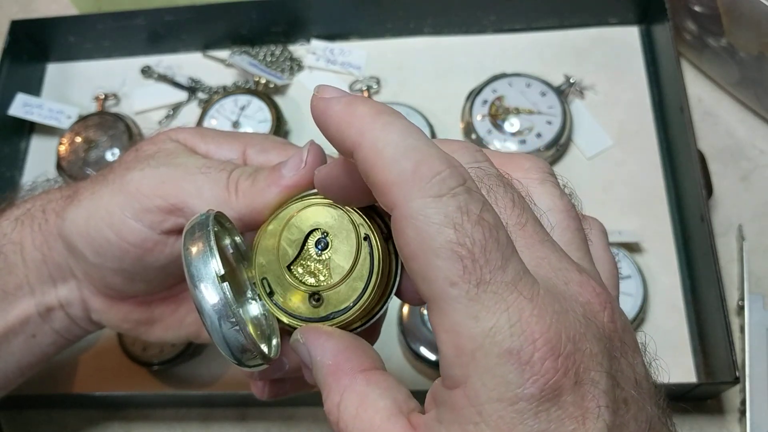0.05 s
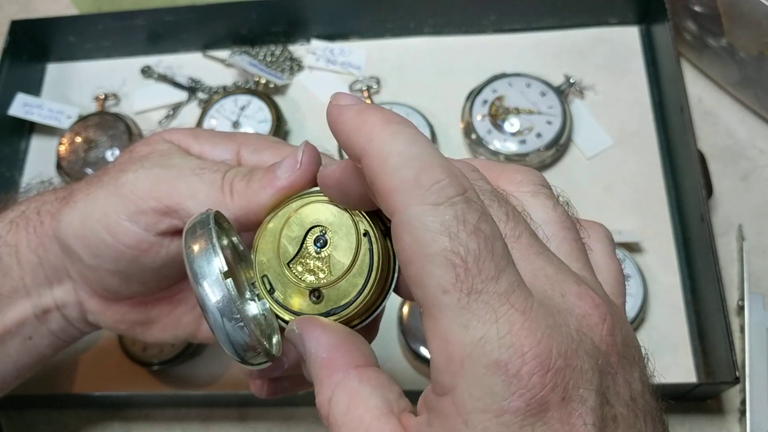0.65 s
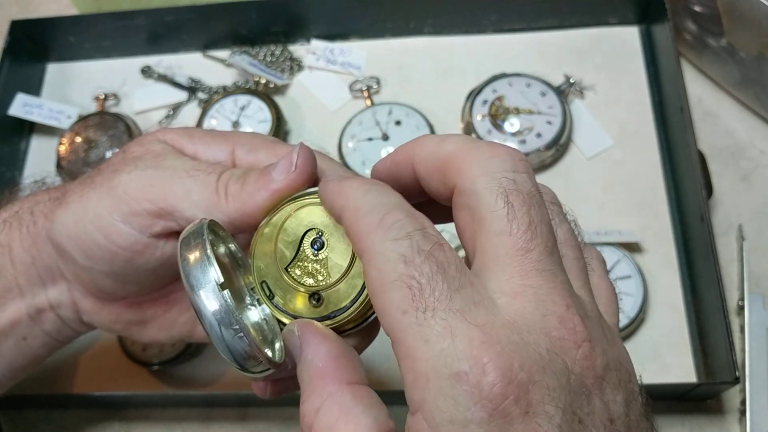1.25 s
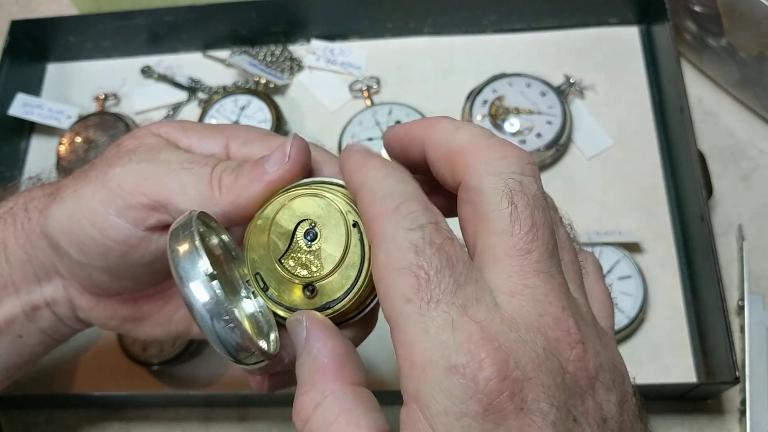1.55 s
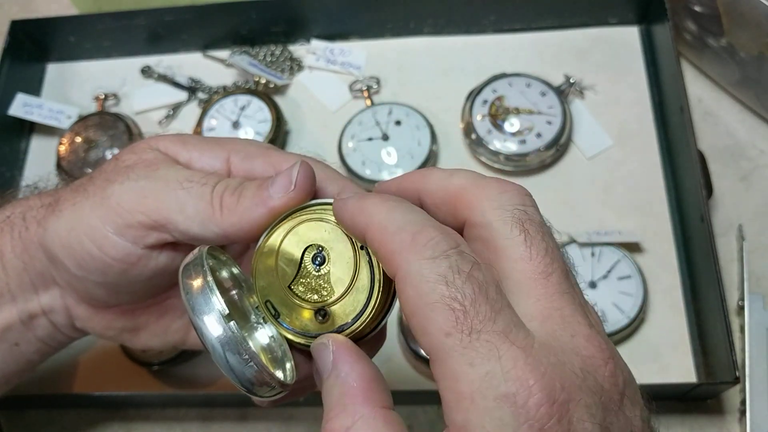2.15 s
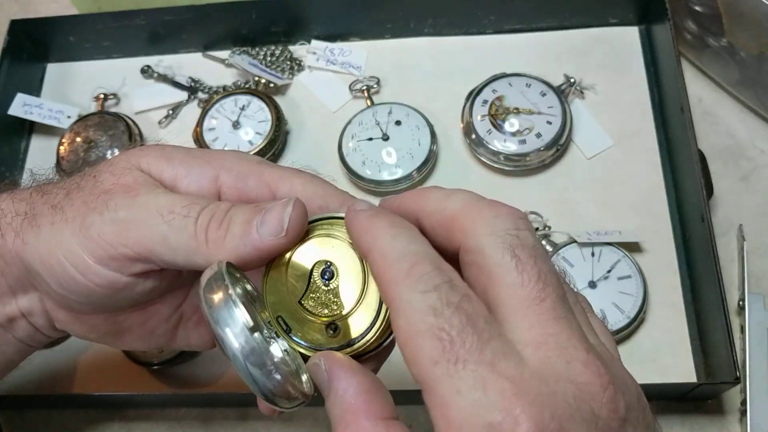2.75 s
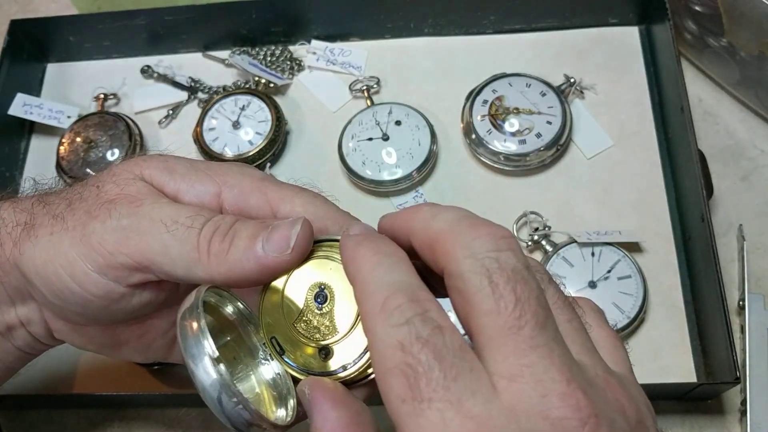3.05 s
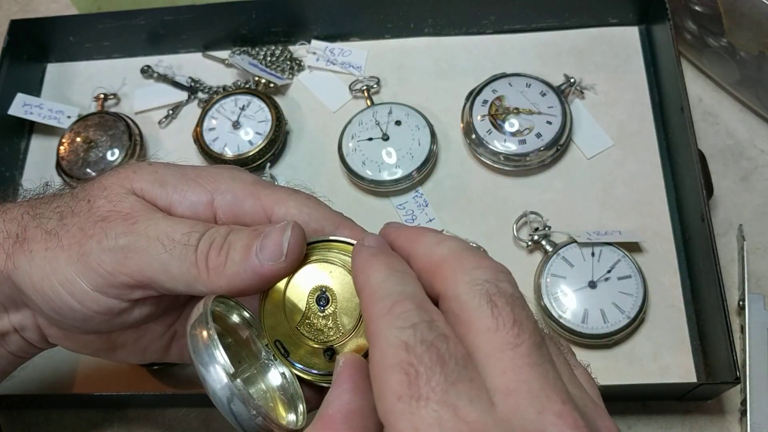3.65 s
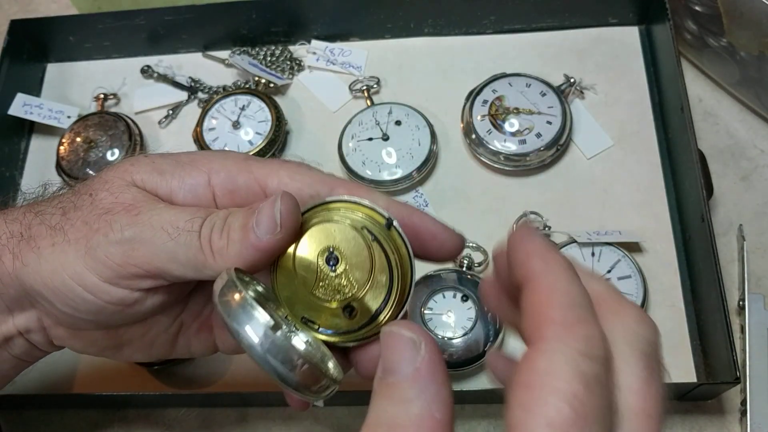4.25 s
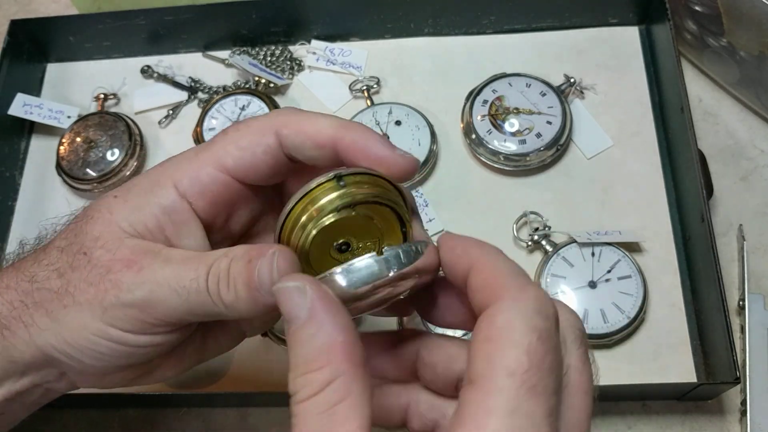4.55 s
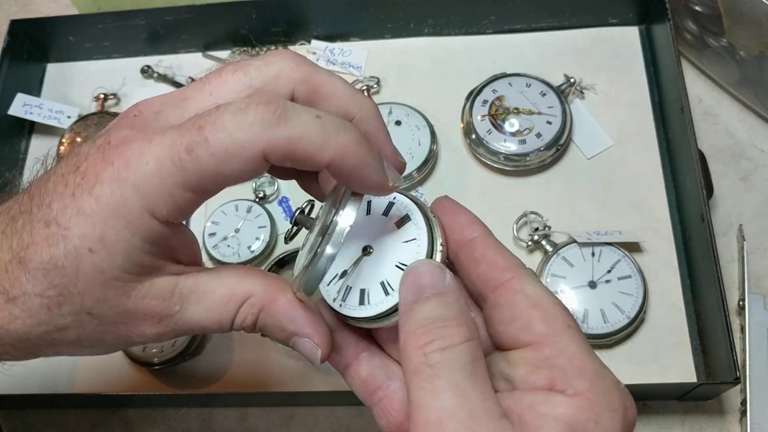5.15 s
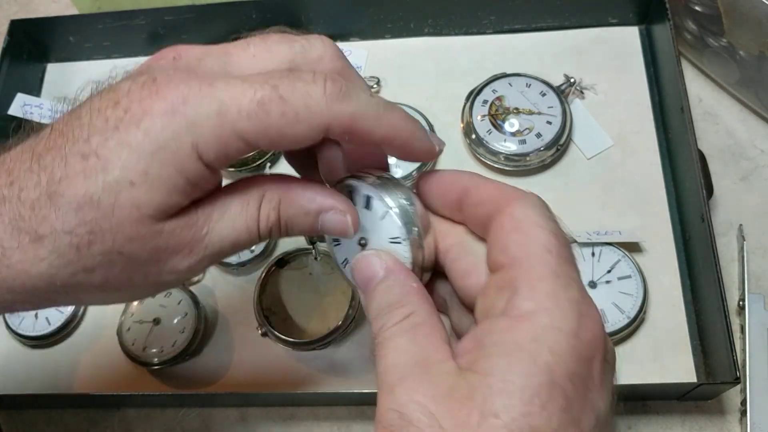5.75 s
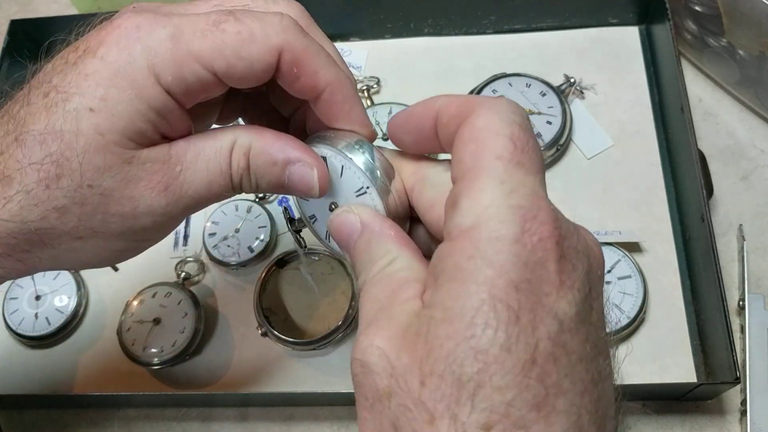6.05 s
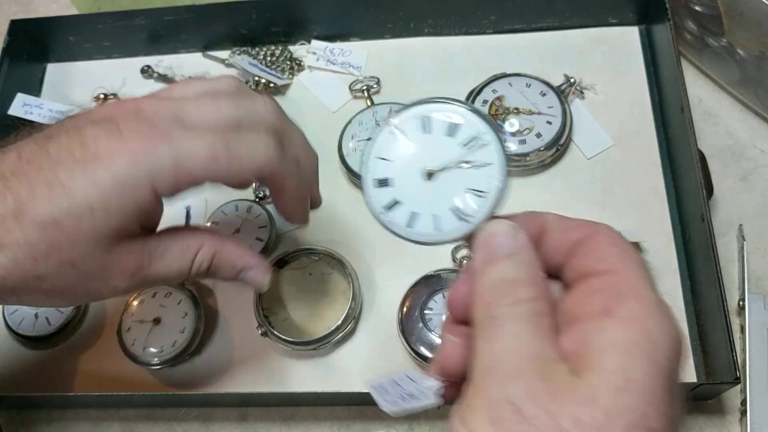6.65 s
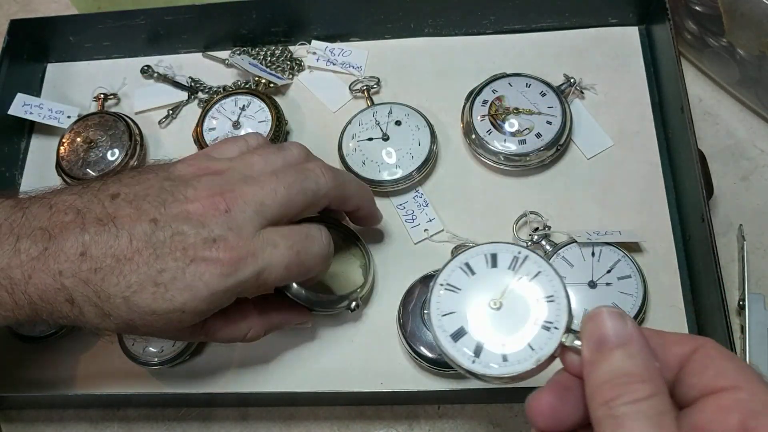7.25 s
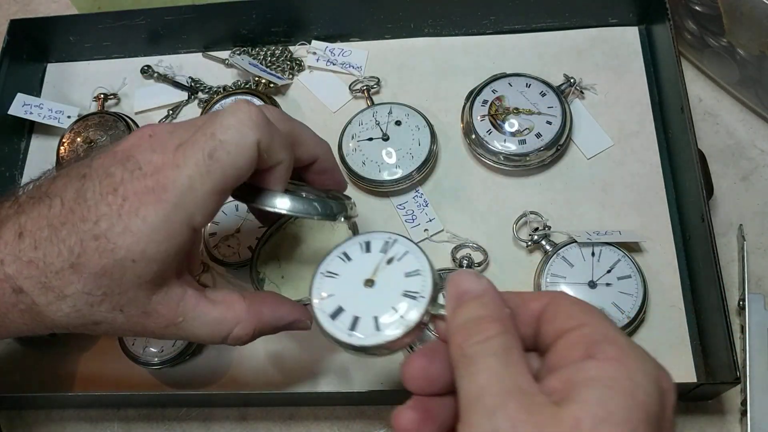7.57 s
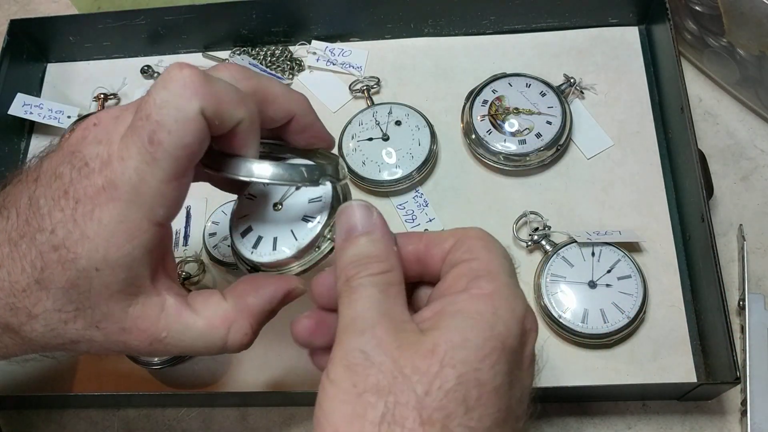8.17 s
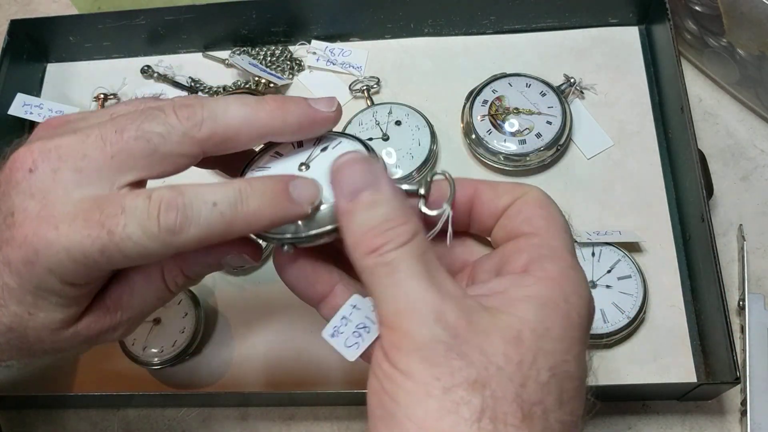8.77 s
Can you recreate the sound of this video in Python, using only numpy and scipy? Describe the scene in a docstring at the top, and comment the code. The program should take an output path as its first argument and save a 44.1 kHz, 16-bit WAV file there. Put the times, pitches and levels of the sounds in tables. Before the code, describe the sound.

Metal pocket watch cases click, snap shut and rattle in the hands, over faint ticking and a low room hum.

```python
"""In a quiet room, close up, two hands work a silver pocket watch over a tray of ticking watches. The dust cap
latch clicks, fingernails click unevenly on the watch and a spring pings. The back and the bezel (the rim around
the glass) snap shut, the catch cracks, the watch rattles into its outer case and the lid drops. Each hit makes
a part ring with its own few tones, which the fingers quickly damp. Fingers rub and bump softly, and a faint
rumble, hum and hiss lie underneath."""
import sys
import numpy as np
from scipy import signal
from scipy.fft import rfft, irfft
from scipy.io import wavfile
from scipy.ndimage import uniform_filter1d

SR = 44100
rng = np.random.default_rng(int(sys.argv[2]) if len(sys.argv) > 2 else 0)


def generate_wav(signal):
    """Clip the signal to [-1, 1] and save it as 16-bit WAV at the path in sys.argv[1]."""
    frames = np.transpose(np.atleast_2d(signal))
    scaled = np.clip(frames, -1, 1) * 32767
    pcm = np.round(scaled).astype(np.int16)
    wavfile.write(sys.argv[1], SR, pcm)


N = 397341


def gain(db):
    """Turn decibels into a multiplier."""
    return 10 ** (np.asarray(db) / 20)


def unit(x):
    """Scale a sound to an average (rms) level of 1."""
    return x / np.sqrt(np.mean(x ** 2))


def add(out, start_s, x):
    """Mix x into out from start_s on."""
    i = max(int(start_s * SR), 0)
    out[..., i:i + x.shape[-1]] += x[..., :max(N - i, 0)]


def noise(colour):
    """Noise shaped by (pitch_hz, level_db) points."""
    hz, db = np.transpose(colour)
    f = np.maximum(np.fft.rfftfreq(N, 1 / SR), 1)
    shape = gain(np.interp(np.log(f), np.log(hz), db))
    return unit(irfft(rfft(rng.standard_normal(N)) * shape, N))


def resonance(f, hz, q):
    """Favour pitches near hz; a higher q makes the peak narrower."""
    return 1 / (1 + 1j * q * (f / hz - hz / f))


def ring(tones, low_hz):
    """A tapped part: each tone fades 60 dB in ring_s, and small parts give off no bass."""
    t = np.arange(SR // 5) / SR
    # neighbouring tones swing against each other
    sound = sum((-1) ** k * gain(db) * 1000 ** (-t / ring_s) * np.sin(2 * np.pi * hz * t)
                for k, (hz, db, ring_s) in enumerate(tones))
    return signal.sosfilt(signal.butter(2, low_hz, "high", fs=SR, output="sos"), sound)


def contact(body, focus_db, level_db, bright_db_per_octave, spot_hz, chatter_s, chatter_db):
    """One blow, then a fading chatter of tiny bounces. Returns the sound ahead and all around."""
    size = len(body)
    t = np.arange(size) / SR
    chatter = rng.standard_normal(size) * rng.exponential(size=size) * np.exp(-t / chatter_s)
    force = gain(chatter_db) * chatter / np.linalg.norm(chatter)
    force[0] += 1  # the first blow
    f = np.maximum(np.fft.rfftfreq(2 * size, 1 / SR), 1)
    hardness = gain(bright_db_per_octave * np.log2(np.maximum(f, 200) / 3000))
    # the spot that is hit changes the tones near spot_hz by focus_db
    spot = 1 + (gain(focus_db) - 1) * resonance(f, spot_hz, q=13)
    ahead = rfft(force, 2 * size) * rfft(body, 2 * size) * hardness * spot
    # each tone beams its own way, so all directions together have a smoother spectrum
    smooth_power = uniform_filter1d(np.abs(ahead) ** 2, size=int(800 / f[1]))
    around = np.sqrt(np.abs(smooth_power)) * np.exp(-2j * np.pi * f * .001)  # 1 ms later
    sound = irfft([ahead, around])[:, :size]
    loudest = uniform_filter1d(sound[0] ** 2, size=SR // 250, mode="constant").max()
    return sound * gain(level_db) / np.sqrt(loudest)


def strike(hits, tones, low_hz, focus_db):
    """Play a list of hits on one part."""
    out = np.zeros((2, N))
    body = ring(tones, low_hz)[:SR // 10]
    for start_s, *blow in hits:
        add(out, start_s, contact(body, focus_db, *blow))
    return out


# how the rumble swells: time_s, relative_db
RUMBLE_SWELLS = [(0.0, -59), (0.22, -69), (0.3, -58), (1.13, -69), (1.38, -57), (1.5, -66), (2.98, -66),
                 (3.03, -54), (3.06, -62), (3.39, -68), (4.16, -61), (5.74, -69), (5.87, -57), (5.92, -66),
                 (6.78, -69), (8.66, -69), (8.98, -63), (9.01, -71)]
# the colour of the rumble and of the hiss: pitch_hz, relative_db
RUMBLE_SHAPE = [(15, -38.5), (25, -18), (33, -9.5), (50, 4), (85, 4), (110, -2.5), (156, -9.5),
                (200, -14.5), (300, -19), (390, -45), (660, -100)]
HISS_SHAPE = [(88, -32), (150, 0), (494, -10), (1040, -14.5), (1720, -15.5), (1900, -17), (2650, -16.5),
              (4950, -20.5), (7470, -27.5), (9630, -27.5), (10600, -32), (11300, -27), (12400, -32),
              (15100, -29), (16000, -35)]
# low hum and thin bands of high hiss: pitch_hz, width_hz, level_db
HUM_BANDS = [(50, 1.3, -74.5), (73.2, 1.5, -78.5), (103.24, 1, -75.5), (127, 1.1, -77.5), (9800, 250, -91),
             (11560, 250, -90.5), (14700, 450, -91.5)]
def background(rumble_trim_db=-1.5, hiss_db=-71):
    """A low rumble that swells as the hands move, a wavering hum and a steady hiss."""
    t, f = np.arange(N) / SR, np.fft.rfftfreq(N, 1 / SR)
    swell_db = np.interp(t, *np.transpose(RUMBLE_SWELLS))
    out = noise(RUMBLE_SHAPE) * gain(swell_db + rumble_trim_db)
    for hz, width_hz, db in HUM_BANDS:
        band = rfft(rng.standard_normal(N)) / (1 + ((f - hz) / width_hz) ** 2)
        out += gain(db) * unit(irfft(band, N))
    return out + noise(HISS_SHAPE) * gain(hiss_db)


# tones of the clockwork, used for all ticks and for the fingernail clicks: pitch_hz, level_db, ring_s
CLOCKWORK_TONES = [(2115, 1.5, 0.0017), (3209, 2.5, 0.0018), (4940, -3.5, 0.0024), (6362, -15.5, 0.0053),
                   (6991, -29, 0.0406), (7496, -11, 0.0018), (9994, -15, 0.0023), (11718, -25, 0.0068),
                   (14297, -15.5, 0.0031)]
# fingernail clicks on the watch: start_s, level_db, bright_db_per_octave, spot_hz
NAIL_CLICKS = [(0.023, -60, 1, 2720), (0.754, -46.5, -2, 2090), (0.961, -50.5, 0.5, 3300),
               (1.244, -52, 2.5, 3180), (1.31, -61.5, -6, 2090), (1.5383, -55, -1.5, 2050),
               (1.793, -56, 2.5, 2820), (2.5372, -52.5, -3, 3460), (2.8662, -51.5, -3, 2430),
               (3.012, -60, 1.5, 1540), (3.0928, -50, -2.5, 2090), (3.5673, -62, 9, 14530),
               (3.6975, -60.5, 0.5, 2220), (4.2643, -58, -4.5, 2200), (4.7248, -60, 1.5, 2110),
               (5.012, -61, -3, 1710), (5.838, -59.4, 1.2, 4110), (7.3717, -61, 0.5, 4370),
               (8.8337, -62, 0, 4270)]
def nail_clicking(chatter_s=0.003, chatter_db=2.5, lead_s=0.0032, lead_db=-15):
    """Fingernails click unevenly on the watch, each click with a faint click just before it."""
    leads = [(s - lead_s, db + lead_db, *rest) for s, db, *rest in NAIL_CLICKS]
    hits = [(*row, chatter_s, chatter_db) for row in leads + NAIL_CLICKS]
    return strike(hits, CLOCKWORK_TONES, low_hz=1200, focus_db=9.5)


def swings(first_s, period_s, tock_after_s, tick_db, tock_vs_tick_db, spot_hz, bright_db_per_octave=1):
    """Each swing of a watch's balance wheel gives a tick and a weaker tock, no two quite alike."""
    for start_s in np.arange(first_s, N / SR, period_s):
        pair = []
        for s, db in (start_s, tick_db), (start_s + tock_after_s, tick_db + tock_vs_tick_db):
            stray_db, stray_octaves = rng.normal(0, [1, 0.15])
            pair.append((s, db + stray_db, bright_db_per_octave, spot_hz * 2 ** stray_octaves))
        yield pair


# watches beating out of step: first_s, period_s, tock_after_s, tick_db, tock_vs_tick_db, spot_hz
HELD_BEAT = (0.3075, 0.348, 0.2, -60, -5, 2950)
TRAY_BEATS = [(0.092, 0.3628, 0.208, -65.5, -5.5, 4250), (0.358, 0.443, 0.228, -66, -5, 5000)]
# the held watch gains and loses time as it is tilted: time_s, late_s
HELD_DRIFT = [(0.3, 0), (1.0, -0.0425), (1.35, -0.021), (2.05, -0.008), (2.4, -0.019), (3.44, 0.02),
              (3.79, 0.029), (4.48, 0.013), (4.83, -0.023), (5.18, -0.009), (5.88, 0.005), (6.92, -0.062),
              (7.27, -0.054), (7.6, -0.06), (9.0, -0.028)]
def ticking(chatter_s=0.0042, chatter_db=4.5, unlock_s=0.0032, unlock_db=-12):
    """On each beat a toothed wheel is softly unlocked, then drops against its stop."""
    drops = []
    for pair in swings(*HELD_BEAT):
        late_s = np.interp(pair[0][0], *np.transpose(HELD_DRIFT))
        drops += [(s + late_s, *blow) for s, *blow in pair]
    for watch in TRAY_BEATS:
        for pair in swings(*watch):
            drops += pair
    unlocks = [(s - unlock_s, db + unlock_db, *rest) for s, db, *rest in drops]
    hits = [(*row, chatter_s, chatter_db) for row in unlocks + drops]
    return strike(hits, CLOCKWORK_TONES, low_hz=1600, focus_db=8)


# tones of the dust cap: pitch_hz, level_db, ring_s
CAP_TONES = [(1400, -5, .003), (2290, 0, .008), (2960, -6, .02), (3490, -2, .03), (4250, -2, .003),
             (4935, -7, .036), (5490, -13, .012), (6090, -6, .018), (7370, -10, .024), (7925, -12, .028),
             (8940, -8, .004), (10140, -14, .02), (11400, -9, .009), (12690, -16, .014), (13240, -13, .014),
             (14000, -8, .0037), (15340, -9, .011)]
# its latch: start_s, level_db, bright_db_per_octave, spot_hz, chatter_s, chatter_db
CAP_HITS = [(0.1059, -50, 2, 14860, 0.013, 6), (0.1376, -35.0, 0.5, 3510, 0.007, -1),
            (0.152, -47, -6, 2860, 0.0058, 5)]
def cap_click():
    """The latch makes the dust cap ring with three quick clicks."""
    return strike(CAP_HITS, CAP_TONES, low_hz=890, focus_db=-3)


# skin and metal sliding: start_s, length_s, level_db, pitch_hz
SLIDES = [(0.26, 0.46, -68, 118), (1.148, 0.44, -78.5, 650), (2.545, 0.19, -75, 2700),
          (2.779, 0.27, -81.5, 2450), (3.558, 0.051, -72.5, 2320), (3.827, 0.067, -75, 2320),
          (4.357, 0.36, -78.5, 1630), (6.473, 0.051, -65.5, 1060), (6.949, 0.37, -79.5, 1300),
          (7.045, 0.033, -69.5, 2300), (7.774, 0.087, -66.5, 1510), (8.073, 0.083, -58, 3070),
          (8.13, 0.115, -63, 1350), (8.134, 0.04, -67, 3200), (8.128, 0.063, -67, 617)]
def rubbing(uneven_db=4, slip_chance=.05):
    """Each slide is a swell of tiny uneven slips, loosely gathered around one pitch."""
    out = np.zeros(N)
    for start_s, length_s, db, hz in SLIDES:
        size = int(length_s * SR)
        slips = rng.standard_normal(size) * gain(uneven_db * rng.standard_normal(size))
        slips *= rng.random(size) < slip_chance
        f = np.maximum(np.fft.rfftfreq(size, 1 / SR), 1)
        sound = irfft(rfft(slips) * resonance(f, hz, q=2.3), size)
        add(out, start_s, gain(db) * unit(sound * signal.windows.tukey(size, .5)))
    return out


# tones of a steel spring in the open clockwork: pitch_hz, level_db, ring_s
SPRING_TONES = [(5535, 0, .17), (6980, -4, .11), (9588, -15, .15), (12060, -15, .15)]
# its pings: start_s, level_db
SPRING_PINGS = [(1.1, -63), (1.4235, -61), (1.6822, -62.5), (2.0148, -66), (2.6333, -66), (2.6603, -63),
                (3.2545, -71.5)]
def spring(shut_db=-57):
    """The spring rings now and then, and when the back snaps shut over it."""
    out = np.zeros(N)
    ping = ring(SPRING_TONES, low_hz=2980)
    shut_s = BACK_HITS[0][0]
    for start_s, db in [*SPRING_PINGS, (shut_s, shut_db)]:
        add(out, start_s, gain(db) * ping)
    return out


# tones of the watch's back: pitch_hz, level_db, ring_s
BACK_TONES = [(900, -2, .003), (1450, -12, .008), (2127, -6, .017), (2450, -8, .005), (3244, -9, .012),
              (5530, -5, .036), (6519, -7, .014), (6990, -4, .016), (7560, -15, .025), (8650, -22, .015),
              (10300, 2, .008), (12100, -15, .009), (12670, -16, .016), (13320, -13, .014),
              (14400, -13, .003)]
# its snap: start_s, level_db, bright_db_per_octave, spot_hz, chatter_s, chatter_db
BACK_HITS = [(4.8908, -30, -0.5, 3244, 0.0016, -1)]
def back_snap():
    """The back shuts with one bright blow."""
    return strike(BACK_HITS, BACK_TONES, low_hz=650, focus_db=7)


# tones of the bezel: pitch_hz, level_db, ring_s
BEZEL_TONES = [(1341, -2, 0.0073), (2372, 0, 0.0045), (3673, -17, 0.0198), (4692, -9, 0.0044),
               (5488, -37, 0.0028), (6083, -8, 0.0052), (6670, -8, 0.0199), (7833, -24, 0.0134),
               (7934, -10, 0.0025), (9277, -13, 0.0152), (10192, -16, 0.0128), (10205, -12, 0.0045),
               (11558, -17, 0.0109), (12093, -18, 0.0049), (13024, -24, 0.017), (13706, -17, 0.004),
               (15259, -24, 0.0128)]
# its snap: start_s, level_db, bright_db_per_octave, spot_hz, chatter_s, chatter_db
BEZEL_HITS = [(5.2687, -17.5, -0.2, 780, 0.0015, -11)]
def bezel_snap():
    """The rim around the glass snaps shut loudly, with little bounce."""
    return strike(BEZEL_HITS, BEZEL_TONES, low_hz=520, focus_db=7)


# tones of a dull knock: pitch_hz, level_db, ring_s
KNOCK_TONES = [(750, -10.5, 0.042), (1000, -5.5, .018), (1380, -3, 0.018), (2276, -1.5, 0.0073),
               (3800, -2, 0.004), (6010, -10, 0.0027), (11880, -17.5, 0.00083)]
# finger touches: start_s, level_db, bright_db_per_octave, spot_hz, chatter_s
KNOCK_HITS = [(5.4865, -52.5, 4.7, 1480, 0.0032), (5.5609, -58.5, -0.4, 1380, 0.0038),
              (5.5797, -53.5, 6, 1380, 0.0025), (5.6315, -56, 2.5, 1340, 0.0018),
              (5.8562, -53.5, -1, 900, 0.0021), (6.2206, -59, 1, 2020, 0.0029),
              (6.4281, -51.5, 5.9, 3250, 0.0025), (6.4812, -53, 2, 2170, 0.0065),
              (6.5598, -49.5, 5.2, 2550, 0.002), (7.3226, -60, 2, 1270, 0.0027),
              (8.4652, -62, 5, 1570, 0.0025), (8.4931, -64, 5.3, 1640, 0.0025)]
def knocking(chatter_db=0.3):
    """Fingers and metal meet in dull knocks."""
    hits = [(*row, chatter_db) for row in KNOCK_HITS]
    return strike(hits, KNOCK_TONES, low_hz=450, focus_db=5)


# low tones of a soft bump: pitch_hz, level_db, ring_s
BUMP_TONES = [(178.4, -2.5, 0.036), (249, -0.5, 0.035), (335, -2, 0.021), (510, -3, 0.01), (719, -5, .014),
              (1390, -16, 0.0098)]
# the bumps: start_s, level_db, bright_db_per_octave, spot_hz, chatter_s, chatter_db
BUMP_HITS = [(5.856, -55.5, -2, 300, .003, -5), (6.063, -47, 0, 240, 0.0035, -6.5),
             (7.325, -50.5, -10, 190, .015, 7), (7.357, -56, -10, 172, .012, -3),
             (8.132, -47.5, 10.5, 580, 0.0057, 4)]
def bumping():
    """The watch bumps softly into the palm and the lined tray."""
    return strike(BUMP_HITS, BUMP_TONES, low_hz=109.2, focus_db=0.5)


# tones of the catch: pitch_hz, level_db, ring_s
CATCH_TONES = [(357, -18, 0.0172), (839, -14, 0.018), (1620, -11, 0.0171), (2416, -4, 0.0086),
               (4087, 0, 0.0043), (4980, -6, 0.0084), (6120, -13, 0.0141), (7121, -12, 0.0033),
               (7407, -23, 0.0215), (7952, -20, 0.0201), (8773, -12, 0.01), (9539, -11, 0.009),
               (10227, -18, 0.0074), (10558, -41, 0.0406), (11480, -13, 0.0071), (12526, -16, 0.0075),
               (13073, -9, 0.0046), (14222, -3, 0.0025)]
# its crack: start_s, level_db, bright_db_per_octave, spot_hz, chatter_s, chatter_db
CATCH_HITS = [(6.063, -18.5, 0, 1700, 0.0014, -5)]
def catch_crack():
    """The catch cracks with one hard blow."""
    return strike(CATCH_HITS, CATCH_TONES, low_hz=230, focus_db=3.5)


# tones of the outer case: pitch_hz, level_db, ring_s
CASE_TONES = [(605, -18, 0.011), (1281, -11, 0.018), (1740, -5, 0.01), (2770, 4.5, 0.0048),
              (4540, 2, 0.0022), (5220, -20.5, 0.039), (5870, -11.5, 0.0071), (6920, -18.5, 0.021),
              (8000, -21.5, 0.016), (8800, -25.5, 0.026), (8700, -8.5, 0.0018), (10200, -34, 0.021),
              (10800, -25, 0.029), (11900, -33, 0.019), (12500, -16.5, 0.0025), (15349, -35, 0.0025)]
# the rattle: start_s, level_db, bright_db_per_octave, spot_hz, chatter_s, chatter_db
CASE_HITS = [(7.7701, -46, 3.5, 1890, 0.002, -3), (7.7972, -51.5, 6.5, 3440, 0.0036, -3),
             (7.8441, -56.5, 1, 4130, 0.0026, 8), (7.9137, -58.5, 3.5, 4300, 0.0023, 0),
             (7.9719, -33.5, 0.5, 3230, 0.0059, -17), (7.9734, -31, 1, 4100, 0.0019, 5),
             (8.0898, -42.2, 0, 3050, 0.0029, -2), (8.1189, -31.5, 1.5, 7900, 0.002, -1),
             (8.1306, -35.5, -10.5, 3160, 0.0036, -1), (8.132, -36, 0.5, 2600, 0.0015, 6),
             (8.1827, -37, -3.5, 3180, 0.00094, 8), (8.1842, -34.5, -0.5, 4590, 0.0011, 0),
             (8.1997, -58, -9, 2540, 0.0026, -3), (8.2178, -46, -4.5, 1540, 0.002, 20),
             (8.2328, -42, -1.5, 1880, 0.0029, 12), (8.2381, -42, -3.9, 2540, 0.0039, -9),
             (8.2684, -57, 3.5, 2930, 0.0019, 0)]
def case_rattle():
    """The watch hits one spot after another as it settles into its outer case."""
    return strike(CASE_HITS, CASE_TONES, low_hz=635, focus_db=12)


# tones of the outer lid: pitch_hz, level_db, ring_s
LID_TONES = [(722, -3, 0.0046), (1380, 3.5, 0.0034), (2610, -2.5, 0.0062), (4130, -0.5, 0.0025),
             (5900, -9.5, 0.0053), (6960, -22.5, 0.013), (8280, -14, 0.0066), (10450, -12, 0.0039),
             (11700, -18.5, 0.0072), (12600, -12.5, 0.0042), (14600, -15, .005)]
# its clicks: start_s, level_db, bright_db_per_octave, spot_hz, chatter_s, chatter_db
LID_HITS = [(8.5398, -50.0, 2, 2480, 0.0014, -1), (8.5448, -51, -0.7, 1520, 0.001, -24),
            (8.6405, -39.5, 1, 4100, 0.0023, 1), (8.6442, -43, 0, 1140, 0.012, -7.5),
            (8.98, -57, 1.5, 2890, 0.0099, 6), (8.9971, -39.4, 3, 8290, 0.0059, 0.5)]
def lid_drop():
    """The lid drops and is pressed home."""
    return strike(LID_HITS, LID_TONES, low_hz=500, focus_db=8.5)


def room(ahead, around, near_db=-17, near_s=.006, tail_db=-20, low_ring_s=0.4, high_ring_s=0.29):
    """Quick echoes off hands and tray, then a furnished room's short tail, losing its treble first."""
    t = np.arange(SR // 2) / SR
    f = np.fft.rfftfreq(len(t), 1 / SR)
    near = rng.standard_normal(len(t)) * np.exp(-t / near_s) * (t > .002)
    echoes = rfft(rng.standard_normal(len(t)))
    tail = np.zeros(len(t))
    for octave, ring_s in enumerate(np.linspace(low_ring_s, high_ring_s, 7)):
        low_hz = 125 * 2 ** octave
        band = irfft(echoes * (f >= low_hz) * (f < 2 * low_hz), len(t))
        tail += band * gain(-0.2 * octave - 60 * t / ring_s)
    tail *= np.clip(t / .004, 0, 1)
    scatter = signal.fftconvolve(ahead, near / np.linalg.norm(near))[:N]
    walls = signal.fftconvolve(around, tail / np.linalg.norm(tail))[:N]
    return ahead + gain(near_db) * scatter + gain(tail_db) * walls


def scene():
    """The watches and the hands in the room, over the background."""
    metal = cap_click() + back_snap() + bezel_snap() + catch_crack() + case_rattle() + lid_drop()
    fingers = knocking() + bumping() + rubbing()
    clockwork = nail_clicking() + ticking() + spring()
    ahead, around = metal + fingers + clockwork
    return (room(ahead, around) + background())[None]


def record(dry, top_hz=15900):
    """The recorder cuts off the highest treble."""
    return signal.sosfilt(signal.ellip(8, .2, 70, top_hz, fs=SR, output="sos"), dry)


dry = scene()
out = record(dry)
generate_wav(out)
```